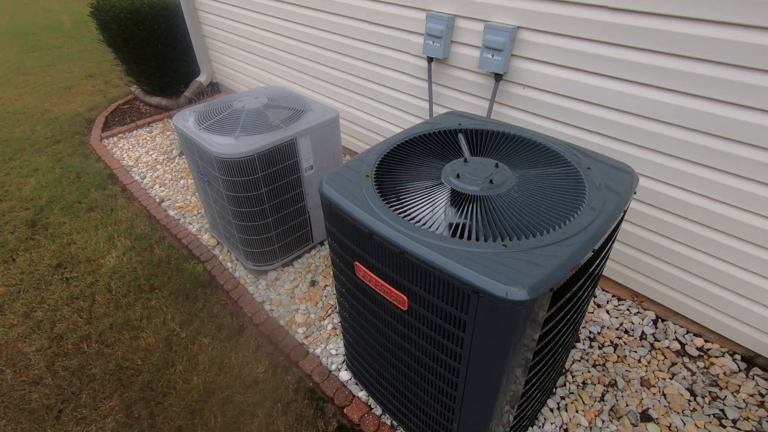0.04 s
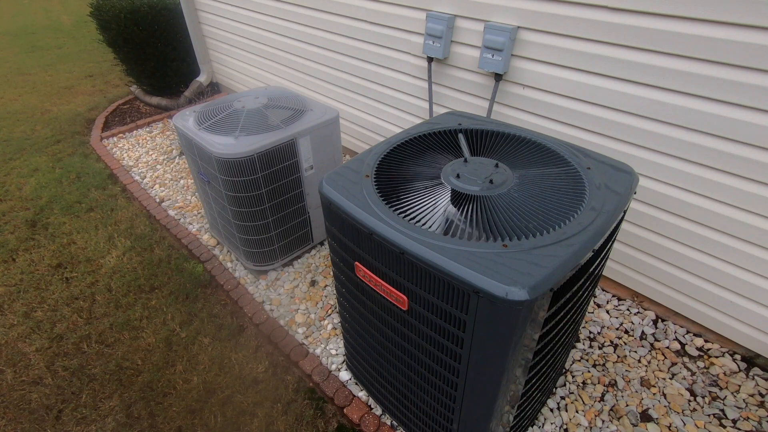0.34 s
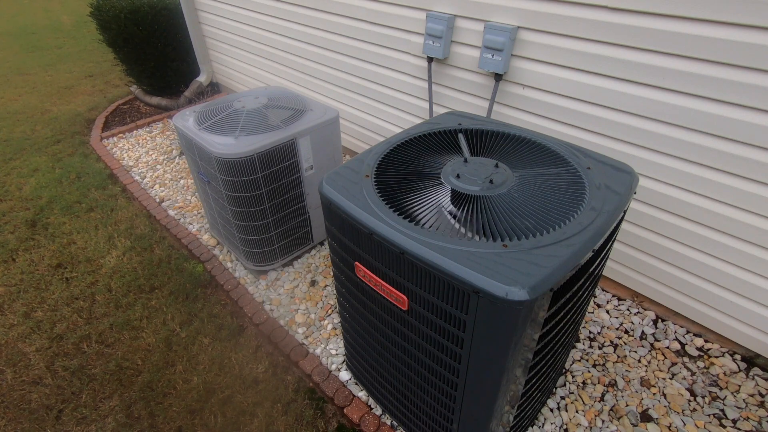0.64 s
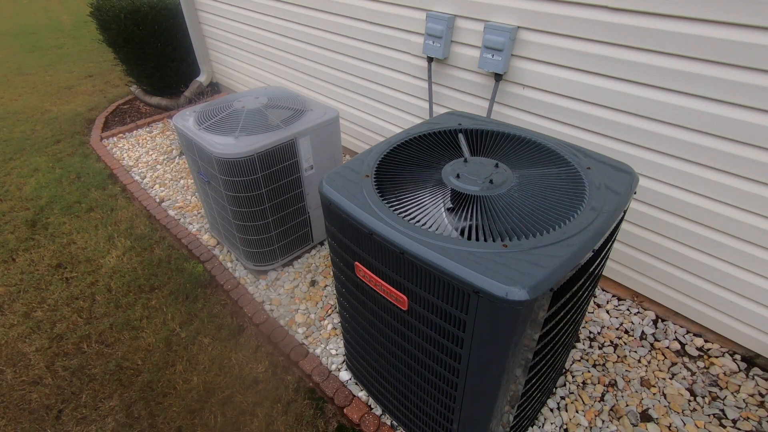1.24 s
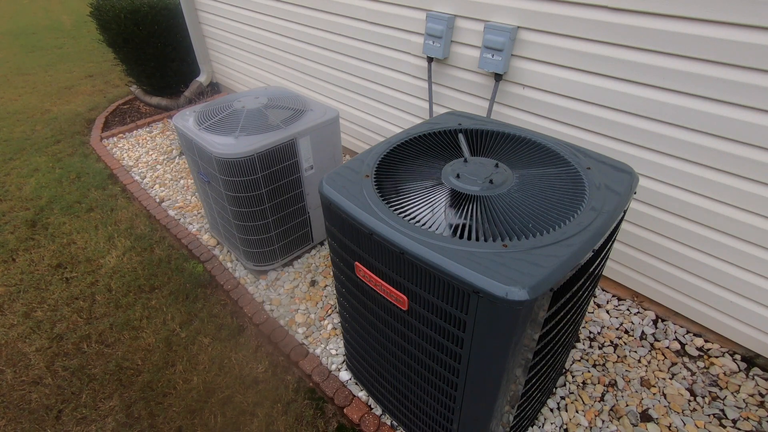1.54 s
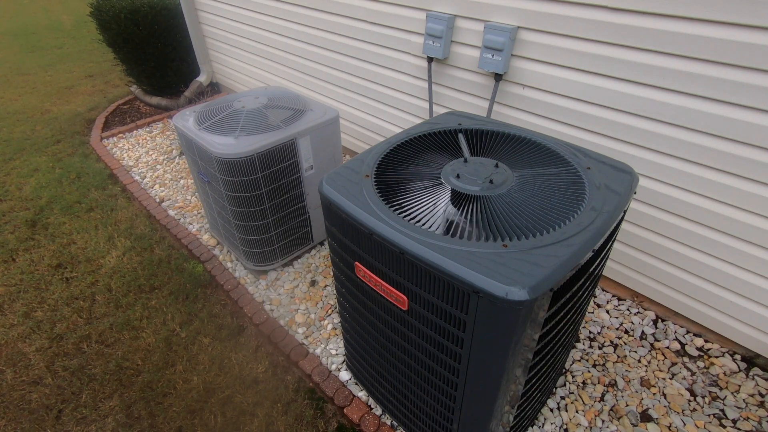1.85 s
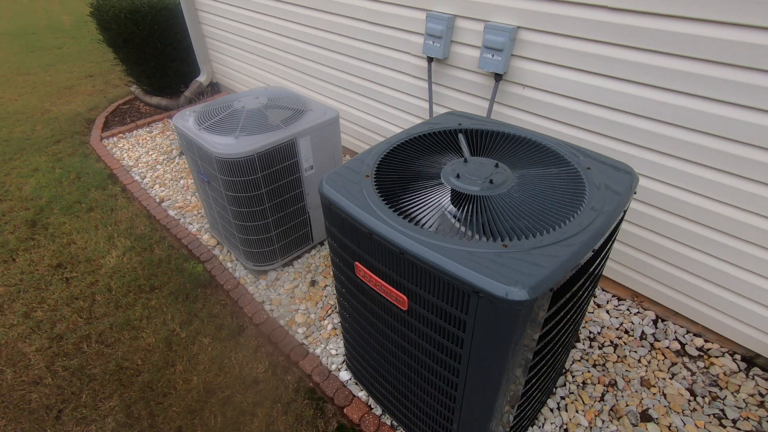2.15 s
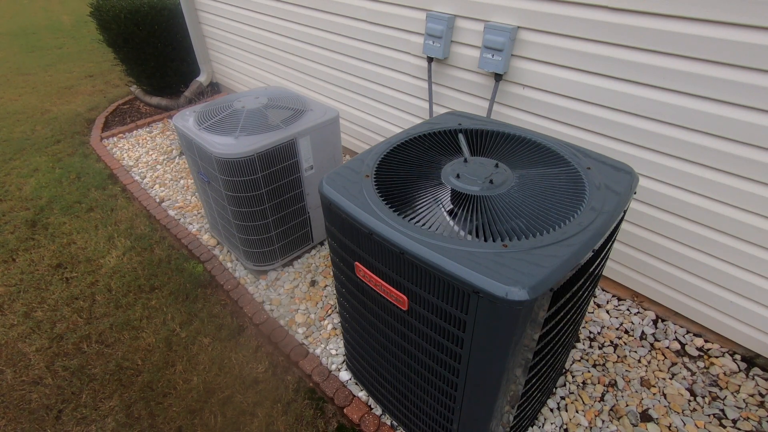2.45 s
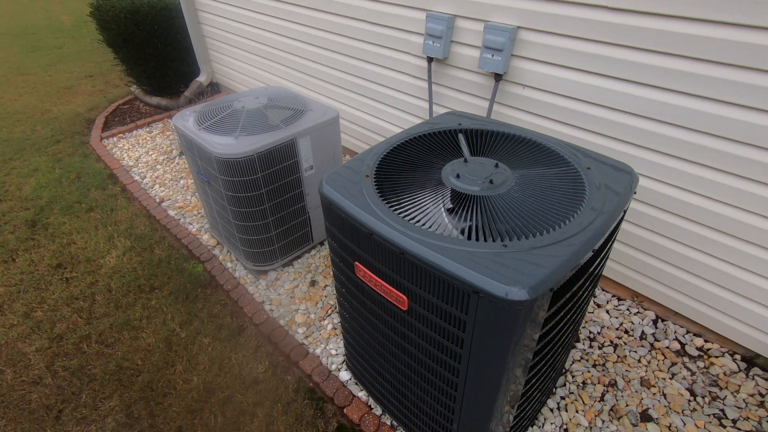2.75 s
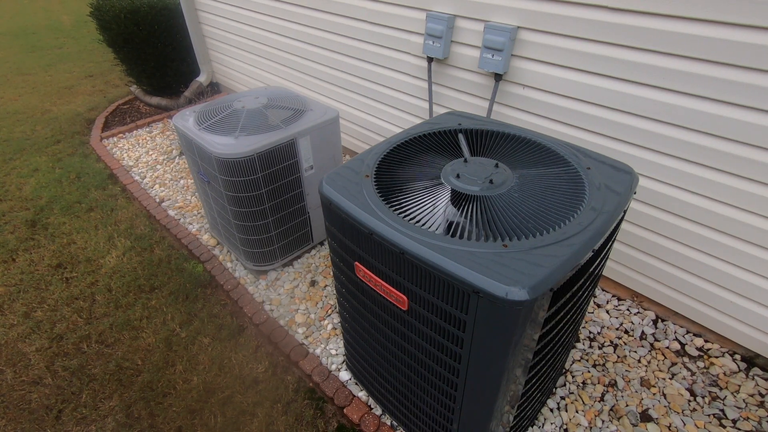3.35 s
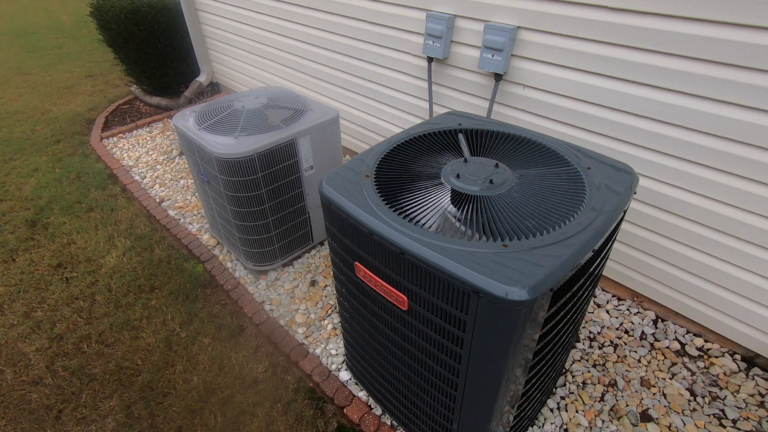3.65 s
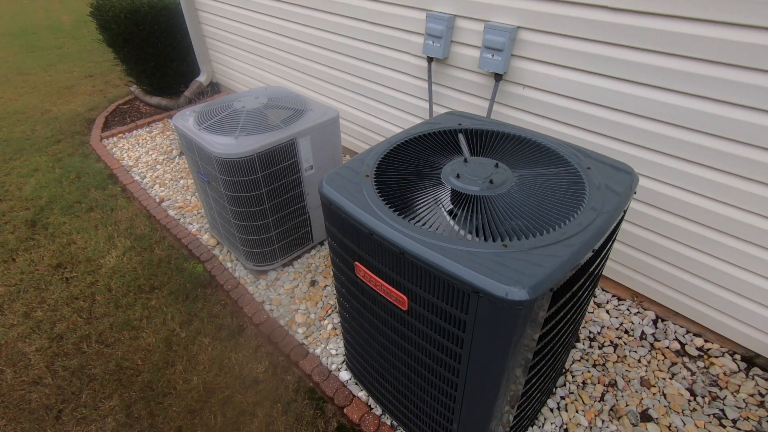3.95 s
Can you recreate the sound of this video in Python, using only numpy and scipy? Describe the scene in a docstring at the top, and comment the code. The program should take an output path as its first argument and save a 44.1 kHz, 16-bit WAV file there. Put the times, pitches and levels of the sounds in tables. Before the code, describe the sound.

A heat pump fan blows with an even, airy rush and a low compressor hum outdoors. Gusts thump on the nearby microphone, growing stronger as the rush dips slightly, with a few small clicks and scuffs.

```python
"""An outdoor heat pump runs beside a house wall. Air rushes through its fan, and its compressor and
motor add a low hum and thin whines. Gusts of air buffet the two microphone ports (left and right
openings), harder in the second half. The recorder's gain ducks after loud gusts, lowering the rush
and hum along a set curve. A few light clicks and scuffs sound close by."""
import sys
import numpy as np
from scipy import signal
from scipy.fft import rfft, irfft
from scipy.io import wavfile
from scipy.ndimage import uniform_filter1d

SR = 44100
rng = np.random.default_rng(int(sys.argv[2]) if len(sys.argv) > 2 else 0)


def digitize_waveform(pressure):
    """Quantize a signal to 16-bit integers and store it at the path in sys.argv[1].

    Rows of a 2-D input are taken as channels; values are limited to [-1, 1].
    """
    field = np.atleast_2d(pressure).T
    bounded = np.clip(field, -1, 1)
    quanta = np.round(bounded * 32767).astype(np.int16)
    wavfile.write(sys.argv[1], SR, quanta)


N = 176400
TIME = np.arange(N) / SR

# clicks and scuffs: t/s, level/dB, rise/s, decay/s, lower edge/Hz
CLICK_EVENTS = [(0.542, -37, .002, 0.013, 4000), (.543, -33, 0.00016, 0.00055, 4500),
                (.601, -23.5, 0.00017, 0.00097, 2900), (.825, -30.5, 0.0001, 0.00041, 12500),
                (1.9805, -28, 0.00065, 0.0018, 1720), (2.299, -34, 0.0038, 0.035, 2140),
                (2.3465, -37.5, .0015, 0.0078, 5440), (2.861, -44.5, 0.019, 0.039, 1500)]
# tone colour of the clicks: f/Hz, relative level/dB
CLICK_SPECTRUM = [(1000, 18.5), (1900, 13), (2500, 7), (3300, 6.5), (4500, -4.5), (7700, 0.5), (9000, -11),
                  (14000, -25.5)]
# brief rings on two of the clicks: t/s, peak level/dB, f/Hz, ring time/s
CLICK_RINGS = [(1.9808, -24, 1920, .0012), (2.309, -33, 1890, .011)]

# tone colour of the air pressure on the ports: f/Hz, relative level/dB
WIND_SPECTRUM = [(12, -29), (30, -0.5), (120, -1), (200, -8), (450, -14), (750, -14), (1300, -22),
                 (4000, -58)]
# how alike the wind is left and right: f/Hz, likeness (1 same, 0 unrelated, -1 opposite)
WIND_LIKENESS = [(50, 0.45), (150, -0.33), (300, -0.25), (600, -0.82), (1000, -0.91)]
# light draught between the gusts: t/s, level/dB
DRAUGHT_LEVEL = [(0, -32), (.5, -30), (.7, -35.5), (.92, -24.5), (1.02, -37), (1.17, -29.5), (1.33, -25),
                 (1.66, -28), (1.77, -25.5), (1.97, -34.5), (2.1, -25), (2.3, -19.5), (2.86, -24.5),
                 (2.93, -33), (2.98, -21.5), (3.22, -25.5), (3.32, -34), (3.52, -27), (3.88, -38),
                 (4, -20.5)]
# gusts: t/s, length/s, level/dB, upper reach/Hz, left minus right/dB
GUST_EVENTS = [(0.057, 0.021, -26.5, 260, 10.5), (0.528, 0.025, -18, 125, 4.5), (0.605, 0.029, -26, 99, 14),
               (0.85, 0.031, -14.5, 450, 1.5), (1.101, 0.014, -16.5, 460, 3.5),
               (1.195, 0.018, -21.5, 330, 3.5), (1.402, 0.047, -20, 135, -2), (1.475, 0.052, -20.5, 320, 4),
               (1.569, 0.063, -21, 240, 9.5), (1.689, 0.047, -21.5, 320, -0.5),
               (2.328, 0.065, -16, 1000, 4.5), (2.468, 0.05, -16.5, 620, 2.5),
               (2.55, 0.051, -19.5, 385, 1.5), (2.617, 0.052, -16.5, 700, 2.5),
               (2.692, 0.047, -13.5, 835, 0.5), (2.756, 0.064, -22.5, 400, -7.5),
               (3.044, 0.052, -18.5, 560, 3), (3.107, 0.037, -15.5, 910, -2.5),
               (3.354, 0.042, -15.5, 243, 2), (3.397, 0.088, -16.5, 580, 1.5), (3.684, 0.025, -20, 160, -8),
               (3.728, 0.061, -15.5, 740, 2.5)]
# single eddies (swirls of air) that slap the left port: t/s, peak level/dB, half width/s
EDDY_SLAPS = [(0.857, -4.5, 0.0012), (1.1098, -5, 0.0014), (2.061, -6, 0.00092), (2.385, -4.5, 0.0007),
              (2.6209, -8, 0.00063), (2.653, -8, 0.00077), (2.7111, -7, 0.00053), (3.0845, -11.5, 0.00045),
              (3.1194, -10, 0.0006), (3.3519, -6, 0.001), (3.4488, -17, 0.00048), (3.7423, -9, 0.00081)]

# the recorder's gain ducks after loud gusts and slowly recovers, lowering rush and hum: t/s, level/dB
BACKGROUND_DUCKING = [(0, -0.5), (.5, 0.06), (.73, -0.5), (1.09, -3), (1.92, -4), (2.28, -2), (2.42, -5),
                      (2.75, -8), (3.68, -7.5), (4, -7.5)]
# compressor and motor tones: f/Hz, base level/dB
PUMP_TONES = [(118.6, -40.5), (948, -54), (1125, -54.5), (1796, -61), (2908, -66.5), (6411, -70),
              (7655, -69.5), (7893, -72.5), (7952, -70.5), (9082, -76)]
# how alike the machine and the clicks are left and right: f/Hz, likeness
SOUND_LIKENESS = [(60, 0.69), (250, 0.61), (380, 0.98), (950, 0.71), (1350, 0.86), (3500, 0.92),
                  (4400, 0.74), (7000, 0.38), (8800, 0.089)]
# tone colour of the fan rush: f/Hz, relative level/dB
FAN_SPECTRUM = [(25, 1.5), (65, 15.5), (130, 8.5), (190, 4.5), (340, 1.5), (480, -2.5), (800, -3.5),
                (1500, -5), (1850, -4.5), (2400, -10.5), (3000, -12), (3600, -14), (4250, -22),
                (7700, -18.5), (8350, -26), (9900, -28), (13500, -47.5)]
# balance of the fan rush: f/Hz, left minus right/dB
FAN_BALANCE = [(200, -3), (630, -3.5), (1050, -6), (2600, -3), (6600, -.5), (10600, -2.5)]
# how far the fan's sound wave is ahead at the left port: f/Hz, phase/rad
FAN_LEAD = [(3800, -0.14), (5000, -1.1), (7300, -0.81), (7950, 1.5), (8600, -0.19)]


def amp(db):
    """Turns decibels into a gain."""
    return 10 ** (np.asarray(db) / 20)


def unit_rms(x):
    """Scales each channel to an average strength (rms) of 1."""
    return x / np.sqrt(np.mean(abs(x) ** 2, axis=-1, keepdims=True) + 1e-20)


def at_hz(table, hz):
    """Reads a table on a log-frequency axis."""
    f, value = np.transpose(table)
    return np.interp(np.log(hz + 1), np.log(f + 1), value)


def at_time(table, t):
    """Reads a table along straight lines between its times."""
    return np.interp(t, *np.transpose(table))


def pan(side_db):
    """Left and right gains for a left-minus-right level."""
    return amp(np.array([[.5], [-.5]]) * side_db)


def add(mix, start, sound):
    """Mixes a sound in at a start time in seconds."""
    part = mix[:, max(round(start * SR), 0):][:, :sound.shape[1]]
    part += sound[:, :part.shape[1]]


def drift(size, rate_hz):
    """A smooth random wobble of rms 1, mostly slower than the rate."""
    hz = np.fft.rfftfreq(size, 1 / SR)
    return unit_rms(irfft(rfft(rng.standard_normal(size)) * np.exp(-(hz / rate_hz) ** 2), size))


def noise_pair(gain, likeness):
    """Left and right noise spectra with the given colour and likeness."""
    left, other = np.exp(2j * np.pi * rng.random((2, len(gain))))
    return gain * np.array([left, likeness * left + np.sqrt(1 - likeness ** 2) * other])


def treble_dip(t, hz, edge_hz=8160):
    """Change in dB that dulls the highest treble while the gain is ducked."""
    return 0.81 * at_time(BACKGROUND_DUCKING, t) / (1 + (edge_hz / (hz + 1)) ** 10)


def clicks(side_db=-1.5, sag_hz_per_s=4000):
    """Short bursts of noise make sharp ticks and slower scuffs; two ring with a falling pitch."""
    out, t = np.zeros((2, N)), TIME[:SR // 4]
    hz = np.fft.rfftfreq(len(t), 1 / SR)
    for start, db, rise, decay, edge_hz in CLICK_EVENTS:
        gain = amp(at_hz(CLICK_SPECTRUM, hz) + 2 * treble_dip(start, hz))
        gain /= np.sqrt(1 + (edge_hz / (hz + 1)) ** 6)
        grit = unit_rms(irfft(noise_pair(gain, at_hz(SOUND_LIKENESS, hz)), len(t)))
        shape = np.minimum(t / rise, 1) * np.exp(-np.maximum(t - rise, 0) / decay)
        add(out, start, amp(db) * pan(side_db) * grit * shape)
    for start, db, ring_hz, ring_s in CLICK_RINGS:
        phase = 2 * np.pi * np.cumsum(ring_hz - sag_hz_per_s * t) / SR
        ring = np.sin(phase + drift(len(t), rate_hz=110))
        shape = t / ring_s * np.exp(1 - t / ring_s)
        add(out, start, amp(db) * pan(side_db) * ring * shape)
    return out


def turbulence(size, reach_hz, build=1, flutter_db=10, lump_db=2):
    """Lumpy pressure on each port; faster air carries small, fluttering eddies that join as it builds."""
    hz = np.fft.rfftfreq(size, 1 / SR)
    gain = amp(at_hz(WIND_SPECTRUM, hz)) / np.sqrt(1 + (hz / reach_hz) ** 3.6) * (hz > 0)
    spectrum = noise_pair(gain, at_hz(WIND_LIKENESS, hz))
    small = hz ** 2 / (hz ** 2 + 890 ** 2)  # small eddies, above 890 Hz, come in quick bursts
    flutter = unit_rms(amp(flutter_db * np.clip(drift(size, rate_hz=111), -2, 2)))
    full = irfft(spectrum * (1 - small), size) + irfft(spectrum * small, size) * flutter
    dull = irfft(spectrum / (1 + (hz / 340) ** 2), size)
    lumps = amp(lump_db * drift(size, rate_hz=67))
    return unit_rms((dull + build * (full - dull)) * lumps)


def wind(rise_s=0.0084, fall_s=0.011):
    """Air hits the ports: a light draught, gusts that rise, hold and drop, and slapping eddies."""
    out = turbulence(N, reach_hz=217) * amp(at_time(DRAUGHT_LEVEL, TIME)) * pan(side_db=4)
    t = TIME[:SR // 4]
    for start, length, db, reach_hz, side_db in GUST_EVENTS:
        shape = np.sin(np.pi / 2 * np.minimum(t / rise_s, 1))
        shape *= np.exp(-np.maximum(t - length, 0) / fall_s)
        build = np.minimum(t / (0.58 * length), 1)
        gust = unit_rms(shape * turbulence(len(t), reach_hz, build)) * np.sqrt(np.mean(shape ** 2))
        add(out, start, amp(db) * pan(side_db) * gust)
    slap_gains = np.array([[1], [-0.15]])  # the right port gets a weak, flipped copy
    for centre, db, width in EDDY_SLAPS:
        u = (TIME - centre) / width
        pulse = (1 - u ** 2 / 2) / (1 + u ** 2 / 2) ** 2 * np.exp(-(u / 10) ** 2)
        out += amp(db) * slap_gains * pulse
    return out


def compressor(waver_depth=0.86, waver_hz=13.3):
    """The compressor and motor hum and whine; their steady tones waver in the moving air."""
    out = np.zeros((2, N))
    for hz, db in PUMP_TONES:
        waver = 1 + waver_depth * (drift(N, waver_hz) + 1j * drift(N, waver_hz))
        phase = 2 * np.pi * (hz * TIME + rng.random())
        right_shift = np.arccos(at_hz(SOUND_LIKENESS, hz)) * np.array([[0], [1]])
        tone = (waver * np.exp(1j * (phase + right_shift))).real
        out += amp(db) * unit_rms(tone)
    return out * pan(side_db=-9) * amp(at_time(BACKGROUND_DUCKING, TIME))


def fan(base_db=-33, ripple_db=1.34, ripple_step_hz=24.69):
    """Air rushes through blades and grille; echoes from wall and ground ripple its tone colour."""
    hz = np.fft.rfftfreq(N, 1 / SR)
    ripple_points = np.arange(0, SR / 2, ripple_step_hz)
    ripple = np.interp(hz, ripple_points, rng.standard_normal(len(ripple_points)))
    gain = amp(at_hz(FAN_SPECTRUM, hz) + ripple_db * ripple)
    spectrum = noise_pair(gain, at_hz(SOUND_LIKENESS, hz)) * pan(at_hz(FAN_BALANCE, hz))
    spectrum[0] *= np.exp(1j * at_hz(FAN_LEAD, hz))
    rush = irfft(spectrum, N)
    # cut the rush into short slices, so each pitch range can change level over time
    f, t, slices = signal.stft(rush / rush.std(), SR, nperseg=512)
    patches = uniform_filter1d(rng.standard_normal(slices.shape), size=8, axis=0)
    patches = uniform_filter1d(patches, size=8, axis=1)
    flicker_db = patches / patches.std()  # about 1 dB either way
    level_db = base_db + at_time(BACKGROUND_DUCKING, t) + treble_dip(t, f[:, None]) + flicker_db
    return signal.istft(slices * amp(level_db), SR, nperseg=512)[1][:, :N]


def scene():
    """The heat pump, the air on the microphone and the small clicks."""
    return fan() + compressor() + wind() + clicks()


def record(dry, edge_hz=15100):
    """Cuts away the very highest treble."""
    low_pass = signal.firwin(511, edge_hz, window=("kaiser", 9), fs=SR)
    return signal.oaconvolve(dry, low_pass[None], "same")


dry = scene()
out = record(dry)
digitize_waveform(out)
```